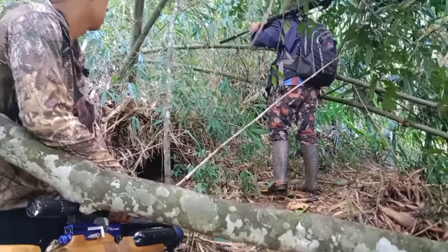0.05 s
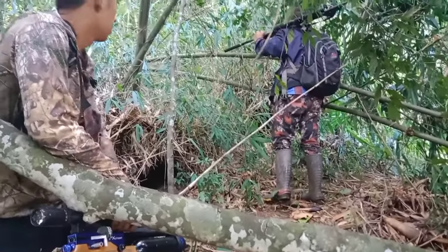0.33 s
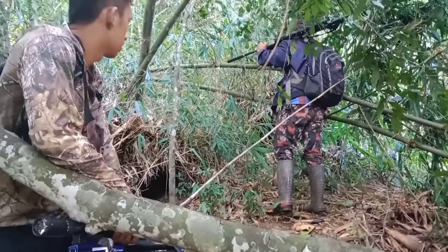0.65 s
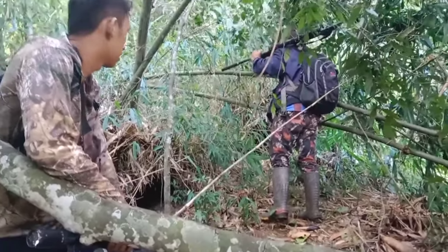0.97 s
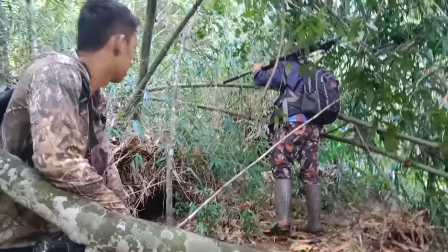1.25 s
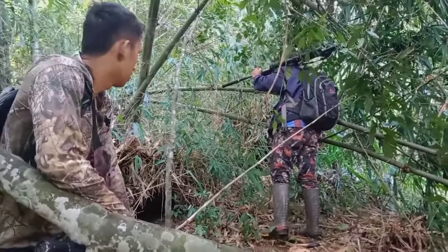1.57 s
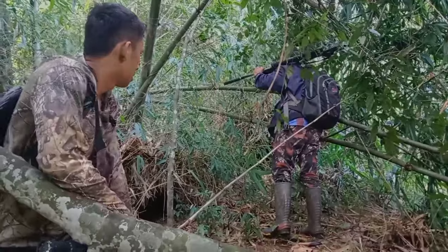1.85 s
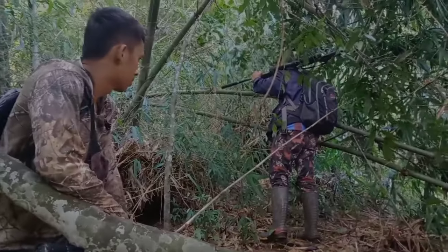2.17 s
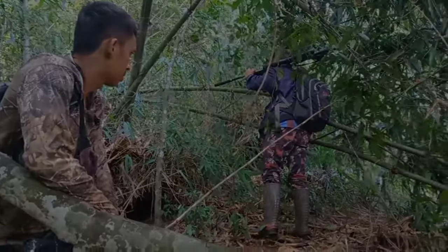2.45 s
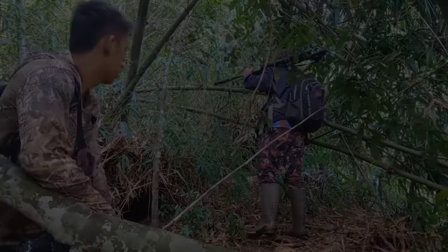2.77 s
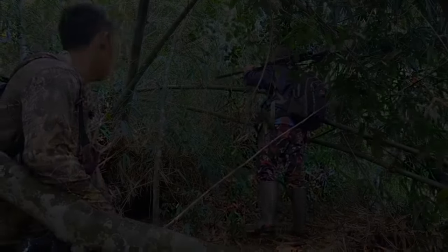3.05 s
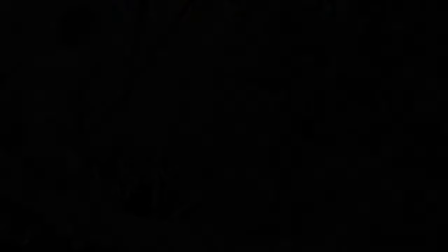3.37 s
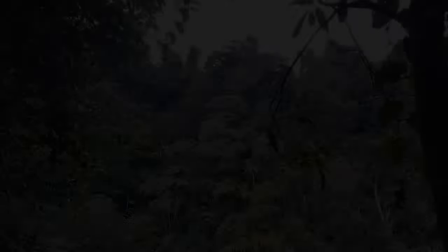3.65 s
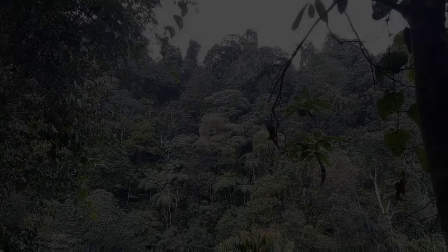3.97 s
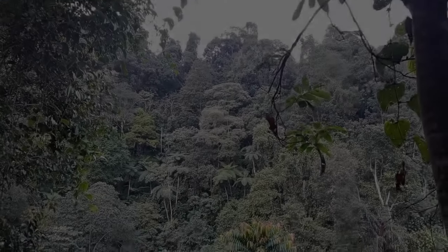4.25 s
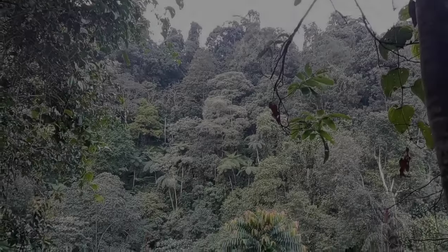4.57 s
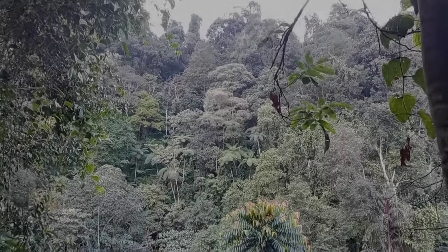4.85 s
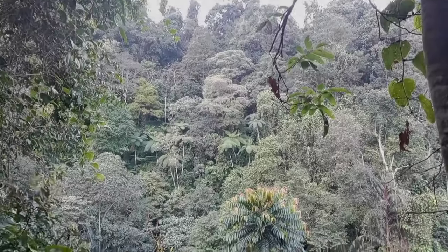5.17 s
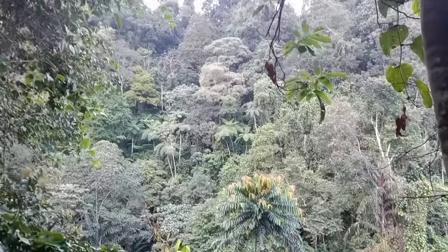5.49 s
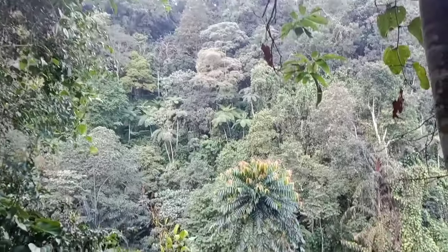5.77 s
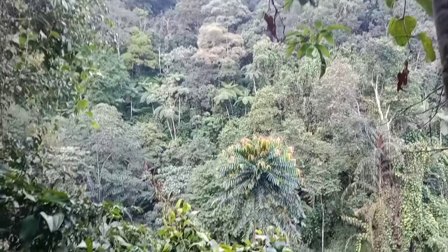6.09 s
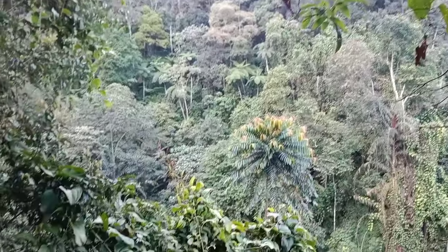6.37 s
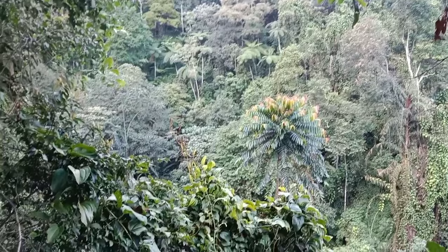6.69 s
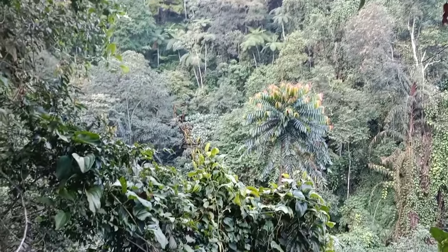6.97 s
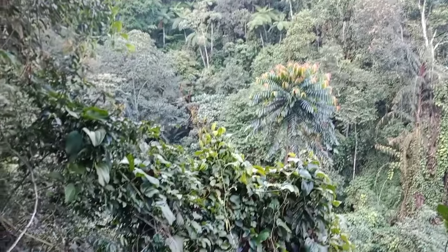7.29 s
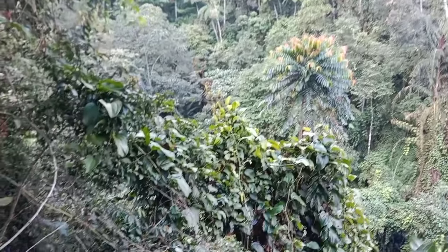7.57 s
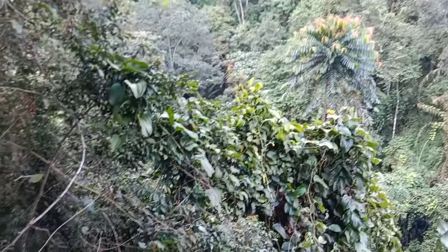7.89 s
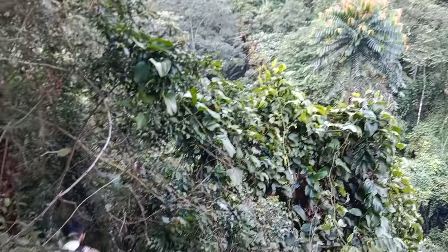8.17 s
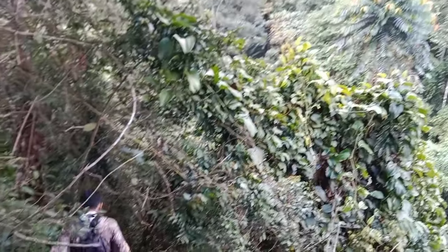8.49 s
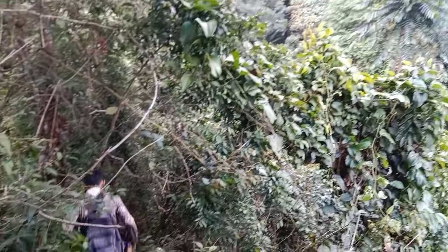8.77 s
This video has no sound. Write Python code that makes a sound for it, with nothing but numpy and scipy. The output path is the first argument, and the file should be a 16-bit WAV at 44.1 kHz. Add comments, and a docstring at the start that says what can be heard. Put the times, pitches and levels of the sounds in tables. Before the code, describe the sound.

A blade bites into bamboo five times, about half a second apart, cracking the hollow stems among rustling leaves and snapping twigs. After a moment of silence, the even rush of a distant forest stream takes over, quieter than the chops, with occasional low gurgles. Faint air and handling noise touch the microphone, and leaves graze it softly toward the end.

```python
"""Leaves rustle and twigs snap as stems are pulled in a dense bamboo thicket. Five chops follow:
each swing sweeps the leaves, the blade bites and splits a stem, wall and cavity ring, the thicket
echoes. A noise suppressor thins the tails. After a short silence the scene changes: a stream rushes
steadily across a wooded valley, its bubbles blurred by distance, with a few low gurgles.
Air and handling buffet the moving microphone; undergrowth brushes softly past it."""
import sys
import numpy as np
from scipy import signal
from scipy.fft import rfft, irfft
from scipy.io import wavfile
from scipy.ndimage import uniform_filter1d, map_coordinates

SR = 44100
rng = np.random.default_rng(int(sys.argv[2]) if len(sys.argv) > 2 else 0)


def generate_wav(signal):
    """Clip the signal to [-1, 1] and save it as 16-bit WAV at the path in sys.argv[1]."""
    frames = np.transpose(np.atleast_2d(signal))
    scaled = np.clip(frames, -1, 1) * 32767
    pcm = np.round(scaled).astype(np.int16)
    wavfile.write(sys.argv[1], SR, pcm)


N = 389844
T = np.arange(N) / SR
THICKET_END_S, VALLEY_START_S, VALLEY_FADE_S = 3.455, 3.629, 0.066

# noise spectra: f/Hz, relative density/dB
AIR_SPECTRUM = [(25, -7.5), (150, 2.5), (600, 1), (1000, -1), (1400, 0.5), (2800, -18.5), (5500, -9.5),
                (7500, -1), (15000, -12)]
LEAF_SPECTRUM = [(60, -32.5), (300, -19), (600, -15), (850, -24.5), (1300, -10.5), (2400, -11.5),
                 (3200, -10.5), (5500, -5.5), (8000, -3.5), (15000, -4)]
CRACK_SPECTRUM = [(40, -45.5), (130, -30.5), (300, -27), (550, -13), (800, -16.5), (1100, 1), (2200, 1),
                  (4000, 2.5), (6000, -1), (9000, 0.5), (15000, -5.5)]
ECHO_SPECTRUM = [(30, -33), (80, -21.5), (180, -14), (350, -16.5), (600, -2.5), (820, -6.5), (1050, 1.5),
                 (2000, -0.5), (4000, -1.5), (6000, -3), (8000, -2.5), (15000, -7.5)]
STREAM_SPECTRUM = [(60, -34.5), (120, -18.5), (220, -17), (330, -5), (550, 3.5), (760, 0.5), (1300, 2),
                   (2200, -1), (3000, -8), (4100, -7), (5400, -7.5), (6100, -15), (8500, -14.5),
                   (15000, -27.5)]
BUFFET_SPECTRUM = [(25, -19), (45, -15), (80, 2.5), (130, 0), (250, -3.5), (500, -7.5), (2000, -57)]
UNDERGROWTH_SPECTRUM = [(200, -50), (2000, -5), (5000, 0.5), (8000, -0.5), (11000, -1), (15000, -0.5)]

# breaking twigs and fibres: t/s, level/dB, t60/s
TWIG_SNAPS = [(.1, -49.5, .15), (0.1095, -31, 0.06), (0.147, -29.5, 0.032), (.181, -33, 0.036),
              (.556, -69.5, .14), (.7545, -66, 0.22), (0.7824, -39.5, 0.17), (1.746, -61, .08),
              (1.851, -48.5, 0.09), (1.925, -51, 0.11), (2.975, -58, .12), (4.006, -52, .06),
              (4.287, -51, .06), (4.546, -43, .05), (6.567, -35, 0.049), (8.275, -44, .04),
              (8.5687, -46, 0.044)]
# leafy stems pulled and springing back: crest t/s, level/dB, rise/s, t60/s
STEM_PULLS = [(.14, -31.5, 0.019, 0.2), (.29, -63.5, 0.018, 0.17), (1.14, -42.5, 0.033, 0.26),
              (1.38, -66, 0.034, .5), (1.72, -60.5, 0.034, 0.92), (1.89, -55.5, 0.028, .3),
              (2.19, -50, 0.049, .4), (2.252, -42, 0.026, 0.26), (2.74, -66, 0.068, 0.71),
              (3.35, -53, .05, .5)]
# modes of neighbouring canes: f/Hz, width/Hz, gain/dB
CANE_MODES = [(338, 40, 9), (600, 26, 1.5), (986, 14, 3.5), (1390, 11, 2), (1980, 7.5, 2.5),
              (2530, 29, 3.5), (3100, 9.5, 1.5), (3960, 100, 0)]
# noise suppressor threshold: f/Hz, level per bin/dB
SUPPRESSOR_THRESHOLD = [(60, -80), (300, -75), (900, -77), (2000, -84), (4500, -88), (6500, -106),
                        (15000, -115)]
# faint thin rings of nearby canes: crest t/s, level/dB, f/Hz, half-length/s
CANE_RINGS = [(.3, -87, 2580, 0.024), (.53, -89, 2550, 0.05), (1.68, -82.5, 2016, 0.078)]
# blade blows: t/s, bite/dB, split delay/s, split/dB, relative crack/dB, wall pitch ratio,
# cavity f/Hz, relative cavity/dB, thud/dB, echo/dB, echo base t60/s
BLOWS = [(0.7957, -21.5, 0.0099, -18, 1.5, 0.96, 425, -18.5, -50.5, -23.5, 0.31),
         (1.449, -25, .0110, -26.5, -3.5, 1.05, 550, -12, -53, -29.5, 0.26),
         (1.9500, -22, 0.0031, -24.5, 7, 1.16, 574, -10, -51.5, -23, 0.36),
         (2.4030, -25, .0040, -28, 4, 1.18, 578, -5, -63, -27.5, 0.49),
         (3.1380, -22, 0.013, -22, -0.5, 0.96, 405, -8, -39, -26, 0.45)]
# bamboo wall modes at pitch ratio 1: f/Hz, width/Hz, relative peak/dB
WALL_MODES = [(1067, 68, -3), (1200, 68, -14.5), (1780, 79, -6.5), (1980, 160, -3.5), (2380, 110, -6.5),
              (3120, 150, -3.5), (3380, 170, -9.5), (7300, 550, -11)]
# echo decay by pitch: f/Hz, t60 ratio
ECHO_T60_RATIO = [(100, 1.3), (600, 0.7), (1500, .8), (4000, 1), (8000, 1.093), (15000, 1.1)]

# notch where the ground reflection cancels the stream: t/s, f/Hz
GROUND_NOTCH = [(3.7, 336), (4.15, 424), (4.75, 370), (5.05, 335), (5.6, 428), (5.9, 260), (6.15, 272),
                (6.5, 377), (6.8, 260), (7.1, 342), (7.7, 340), (8.0, 265), (8.22, 353), (8.48, 229),
                (8.68, 250), (8.84, 332)]
# air and handling on the microphone: t/s, level/dB
BUFFET_LEVEL = [(3.65, -73), (4.0, -61.5), (4.45, -65), (4.9, -68), (5.3, -71.5), (5.8, -71.5),
                (8.5, -70.5), (8.84, -65)]
# smaller air pockets in the stream: t/s, level/dB
BURBLE_LEVEL = [(3.8, -74), (4.2, -63), (5.4, -60), (5.9, -69), (8.84, -72.5)]
# large air pockets: crest t/s, level/dB, f/Hz, half-length/s
LOW_GURGLES = [(3.914, -56, 250, 0.084), (4.199, -54, 317, 0.1), (4.4, -57.5, 170, 0.082),
               (4.754, -61, 248, 0.062), (5.038, -50.5, 304, 0.11), (5.461, -50, 316, 0.072),
               (5.76, -55.5, 316, 0.078), (6.736, -56.5, 318, 0.063), (7.41, -57, 298, 0.057),
               (8.47, -53.5, 363, 0.067)]
# undergrowth passing the microphone: crest t/s, level/dB, rise/s, t60/s
BRUSH_STROKES = [(4.3, -52, 0.025, .3), (4.67, -51, .04, .4), (6.4, -52, .1, 2.2), (6.585, -46, .02, .35),
                 (6.72, -43.5, 0.053, 0.61), (6.92, -49.5, 0.13, 0.31), (7.6, -48, 0.088, 2.5),
                 (8.09, -49.5, 0.031, 1.4), (8.26, -50.5, 0.11, 0.82), (8.58, -51.5, 0.11, 0.73),
                 (8.81, -40, 0.031, .2)]
# microphone response, port resonance near 8 kHz: f/Hz, gain/dB
MIC_RESPONSE = [(1000, -0.5), (6200, 2), (7600, 5), (8600, 1.5), (9250, -9.5), (9900, -6.5), (11400, -10),
                (13100, -7), (13800, -16), (15600, -16.5)]


def from_db(db):
    return 10 ** (np.asarray(db) / 20)


def unit_rms(x):
    return x / np.sqrt(np.mean(x ** 2) + 1e-20)


def at_time(curve, t_s=T):
    return np.interp(t_s, *np.transpose(curve))


def at_hz(curve, hz):
    """Interpolate on a log-frequency axis."""
    knots_hz, values = np.transpose(curve)
    return np.interp(np.log(np.maximum(hz, 1)), np.log(knots_hz), values)


def add(out, start_s, sound):
    i = max(round(start_s * SR), 0)
    out[i:i + len(sound)] += sound[:N - i]


def coloured(x, spectrum):
    """Minimum-phase filter via the folded cepstrum."""
    size = 8192
    gain = from_db(at_hz(spectrum, np.fft.rfftfreq(size, 1 / SR)))
    cepstrum = irfft(np.log(gain))
    cepstrum[1:size // 2] *= 2
    cepstrum[size // 2 + 1:] = 0
    return signal.oaconvolve(x, irfft(np.exp(rfft(cepstrum))))[:len(x)]


def resonance(x, hz, width_hz):
    """Two-pole resonator, unity peak gain."""
    r = np.exp(-np.pi * width_hz / SR)
    feedback = [1, -2 * r * np.cos(2 * np.pi * hz / SR), r * r]
    return signal.lfilter(np.array([1, 0, -1]) * (1 - r * r) / 2, feedback, x + 1e-18)


def noise(spectrum, size=N):
    return unit_rms(coloured(rng.standard_normal(size), spectrum))


def narrow_noise(hz, width_hz, size=N):
    return resonance(resonance(rng.standard_normal(size), hz, width_hz), hz, width_hz)


def drift(per_s):
    """Random wander, rms 1."""
    knots = rng.standard_normal(4000)
    return unit_rms(np.interp(T * per_s, np.arange(len(knots)), knots))


def clicks(per_s, spread_db):
    """Random impulses of uneven size."""
    sizes = from_db(spread_db * np.minimum(rng.exponential(1, N), 4))
    return sizes * rng.choice([-1, 1], N) * (rng.random(N) < per_s / SR)


def decay(t, t60_s):
    return (t >= 0) * np.exp(-np.log(1000) * np.maximum(t, 0) / t60_s)


def strokes(rows):
    """Envelope of swells: Gaussian rise, exponential fall, powers summed."""
    power = 0
    for crest_s, db, rise_s, t60_s in rows:
        rise = np.exp(-(np.minimum(T - crest_s, 0) / rise_s) ** 2)
        fall = decay(np.maximum(T - crest_s, 0), t60_s)
        power += (from_db(db) * rise * fall) ** 2
    return np.sqrt(power)


def forest_air():
    """Faint hiss, rising around the first blow."""
    return noise(AIR_SPECTRUM) * from_db(np.interp(T, [0.7, 1.2], [-89, -80]))


def snaps():
    """Small dry breaks with short scattered tails."""
    out, t = np.zeros(N), np.arange(SR // 2) / SR
    for start_s, db, t60_s in TWIG_SNAPS:
        add(out, start_s, from_db(db) * noise(LEAF_SPECTRUM, len(t)) * decay(t, t60_s))
    return out


def foliage(spectrum, ticks_per_s, hiss_db):
    """Leaves tick together in clumps over a sliding hiss."""
    ticks = unit_rms(clicks(ticks_per_s * from_db(3.7 * drift(per_s=60)), spread_db=2))
    hiss = from_db(hiss_db) * rng.standard_normal(N)
    return unit_rms(coloured(ticks + hiss, spectrum))


def rustle(swing_re_bite_db=-21.5, swing_rise_s=0.022, swing_t60_s=0.2):
    """Leaves sound at each pull and swing, and stir faintly between blows."""
    swings = [(s, bite_db + swing_re_bite_db, swing_rise_s, swing_t60_s) for s, bite_db, *_ in BLOWS]
    chopping = (T > BLOWS[0][0]) & (T < BLOWS[-1][0])
    stir_db = np.where(chopping, -74, -95) + 4.5 * drift(per_s=8.3)
    envelope = np.hypot(strokes(list(STEM_PULLS) + swings), from_db(stir_db))
    return envelope * foliage(LEAF_SPECTRUM, ticks_per_s=2800, hiss_db=-2)


def shaken_canes(shake):
    """Neighbouring canes ring on when shaken."""
    return sum(from_db(db) * resonance(shake, hz, width_hz) for hz, width_hz, db in CANE_MODES)


def suppressor(x, floor_db):
    """Weak bins are turned down, so tails break into thin rings."""
    hz, _, bins = signal.stft(x, SR, nperseg=512)
    power = uniform_filter1d(abs(bins) ** 2, 5, axis=1)
    threshold = from_db(at_hz(SUPPRESSOR_THRESHOLD, hz))[:, None] ** 2
    excess = (power / threshold) ** 2
    gain = np.maximum(excess / (1 + excess), from_db(floor_db))
    return signal.istft(bins * gain, SR, nperseg=512)[1][:N]


def whistles(width_hz):
    """Thin, unsteady tones swell and fade."""
    out = np.zeros(N)
    for crest_s, db, hz, half_s in CANE_RINGS:
        envelope = np.exp(-((T - crest_s) / half_s) ** 2)
        out += from_db(db) * unit_rms(narrow_noise(hz, width_hz)) * envelope
    return out


def blade_contact(t, pitch_ratio, crack_db, crack_t60_s, wall_db):
    """Fibres tear in a burst; impact and tearing ring the stem wall."""
    tearing = decay(t, crack_t60_s)
    crack = noise(CRACK_SPECTRUM, len(t)) * tearing
    force = (t == 0) + 0.063 * rng.standard_normal(len(t)) * tearing
    wall = 0
    for hz, width_hz, db in WALL_MODES:
        ring = resonance(force, hz * pitch_ratio, width_hz) * rng.choice([-1, 1])
        wall += from_db(db) * ring / np.max(abs(ring))
    return from_db(crack_db) * crack + from_db(wall_db) * wall


def thicket_echo(t, t60_s, build_s, ripple_db=4, ripple_step_hz=110):
    """Stems scatter a blow, favouring some pitches; each octave decays at its own rate."""
    hz = np.fft.rfftfreq(len(t), 1 / SR)
    knots = rng.standard_normal(1000)
    ripple = np.interp(hz / ripple_step_hz, np.arange(len(knots)), knots) / (1 + (hz / 4000) ** 2)
    scatter = rfft(noise(ECHO_SPECTRUM, len(t))) * unit_rms(from_db(ripple_db * ripple))
    octave = np.log2(np.clip(hz, 125, 16000))
    tail = 0
    for centre in range(6, 15):
        band = irfft(scatter * np.maximum(1 - abs(octave - centre), 0), len(t))
        tail += band * decay(t, t60_s * at_hz(ECHO_T60_RATIO, 2 ** centre))
    return tail * (1 - np.exp(-t / build_s))


def chops():
    """Blade bites, stem splits, cavity knocks, cane thuds, thicket echoes."""
    out, t = np.zeros(N), np.arange(SR) / SR
    thud_band = signal.butter(3, [130, 330], "band", fs=SR, output="sos")
    for (start_s, bite_db, split_delay_s, split_db, crack_db, pitch_ratio,
         cavity_hz, cavity_db, thud_db, echo_db, echo_t60_s) in BLOWS:
        bite = blade_contact(t, pitch_ratio, crack_db - 2.5, crack_t60_s=0.078, wall_db=0)
        add(out, start_s, from_db(bite_db) * bite)
        split = blade_contact(t, pitch_ratio, crack_db, crack_t60_s=0.016, wall_db=1.5)
        add(out, start_s + split_delay_s, from_db(split_db) * split)
        knock = np.sin(2 * np.pi * cavity_hz * t) * decay(t, t60_s=0.11) * (1 - np.exp(-t / 0.0024))
        add(out, start_s, from_db(bite_db + cavity_db - 1) * knock)
        thud = unit_rms(signal.sosfilt(thud_band, rng.standard_normal(len(t))))
        thud *= decay(t, t60_s=0.18) * (1 - np.exp(-t / 0.008))
        add(out, start_s + 0.018, from_db(thud_db) * thud)
        rattle = from_db(drift(per_s=250)[:len(t)])  # single stems stand out
        add(out, start_s, from_db(echo_db) * thicket_echo(t, echo_t60_s, build_s=0.0045) * rattle)
    return out


def bubble_cloud(per_s, t60_cycles, pitches=24):
    """Many briefly ringing bubbles; equal power per Hz."""
    out = np.zeros(N)
    births = clicks(per_s, spread_db=2.5)
    pitch_index = rng.integers(0, pitches, N)
    for k, hz in enumerate(np.geomspace(300, 6000, pitches)):
        r = from_db(-60 * hz / (t60_cycles * SR))
        feedback = [1, -2 * r * np.cos(2 * np.pi * hz / SR), r * r]
        rings = signal.lfilter([1, 0, -1], feedback, births * (pitch_index == k) + 1e-18)
        out += np.sqrt(hz) * unit_rms(rings)
    return unit_rms(out)


def over_ground(x, notch_db, width_octaves, eddy_db):
    """Ground reflection cuts a moving notch; eddies make nearby pitches swell and fade."""
    hz, frame_s, bins = signal.stft(x, SR, nperseg=2048)
    octave = np.log2(np.maximum(hz, 1))[:, None]
    offset = (octave - np.log2(at_time(GROUND_NOTCH, frame_s))) / width_octaves
    grid = np.broadcast_arrays(4 * octave, 15 * frame_s)  # 4 cells/octave, 15 cells/s
    eddies = map_coordinates(rng.standard_normal((64, len(frame_s))), grid, order=3)
    gain_db = notch_db * np.exp(-offset ** 2) + eddy_db * eddies / np.sqrt(1 + hz[:, None] / 1000)
    return signal.istft(bins * from_db(gain_db), SR, nperseg=2048)[1][:N]


def plops(per_s, t60_cycles, glide, low_hz, high_hz):
    """Single larger bubbles, rising in pitch as they decay."""
    out, t = np.zeros(N), np.arange(SR // 10) / SR
    for when, pitch, strength in rng.random((3000, 3))[:int(per_s * N / SR)]:
        hz = low_hz * (high_hz / low_hz) ** pitch
        t60_s = t60_cycles / hz
        chirp = np.sin(2 * np.pi * hz * t * (1 + glide * t / t60_s))
        envelope = decay(t, t60_s) * (1 - np.exp(-t / 0.0011))
        add(out, when * N / SR, (0.18 + strength) * chirp * envelope)
    return unit_rms(out)


def stream(level_db=-40.5, waver_db=0.07, swell_s=0.096):
    """Distance blurs most bubbling into an even rush; it swells in, then holds."""
    swell = 1 - np.exp(-(np.maximum(T - VALLEY_START_S, 0) / swell_s) ** 1.42)
    envelope = from_db(level_db + waver_db * drift(per_s=7)) * swell
    water = rng.standard_normal(N) + from_db(-10.5) * bubble_cloud(per_s=4000, t60_cycles=12.8)
    rush = over_ground(coloured(water, STREAM_SPECTRUM), notch_db=-15, width_octaves=0.38, eddy_db=1.5)
    bubbles = plops(per_s=110, t60_cycles=99, glide=0.079, low_hz=480, high_hz=2600)
    return envelope * unit_rms(unit_rms(rush) + from_db(-9) * bubbles)


def buffet():
    """Lumpy low noise of air and handling on the microphone."""
    return from_db(at_time(BUFFET_LEVEL) + 2.5 * drift(per_s=18)) * noise(BUFFET_SPECTRUM)


def burble():
    """A loose run of low bubbles."""
    bubbles = plops(per_s=45, t60_cycles=24, glide=0.084, low_hz=202, high_hz=390)
    return from_db(at_time(BURBLE_LEVEL)) * bubbles


def gurgles(width_hz):
    """Large air pockets churn briefly at low pitch."""
    out = np.zeros(N)
    for crest_s, db, hz, half_s in LOW_GURGLES:
        swell = signal.windows.hann(int(2 * half_s * SR))
        churn = narrow_noise(hz, width_hz, SR // 2)[-len(swell):]
        add(out, crest_s - half_s, from_db(db) * unit_rms(churn * swell) * np.std(swell) * 2)
    return out


def brush():
    """Undergrowth slides past the microphone: strokes over faint, wavering grazing."""
    grazing_db = -66 + 6.5 * drift(per_s=9.1)
    envelope = np.hypot(strokes(BRUSH_STROKES), from_db(grazing_db))
    return envelope * foliage(UNDERGROWTH_SPECTRUM, ticks_per_s=820, hiss_db=-6.5)


def scene():
    """Thicket, short silence, valley; twigs snap in both."""
    air, blows, twigs, leaves = forest_air(), chops(), snaps(), rustle()
    canes = shaken_canes(from_db(-14) * blows + from_db(-2) * (leaves + twigs))
    thicket = suppressor(blows + twigs + leaves + canes, floor_db=-7.5) + whistles(width_hz=65) + air
    valley = gurgles(width_hz=98) + burble() + buffet() + brush() + twigs
    fade_in = np.clip((T - VALLEY_START_S) / VALLEY_FADE_S, 0, 1)
    return (thicket * (T < THICKET_END_S) + stream() + valley * fade_in)[None]


def record(dry, cutoff_hz=15580):
    """Microphone response, then a steep low-pass."""
    low_pass = signal.ellip(12, 0.1, 70, cutoff_hz, fs=SR, output="sos")
    return signal.sosfilt(low_pass, coloured(dry[0], MIC_RESPONSE))[None]


dry = scene()
out = record(dry)
generate_wav(out)
```